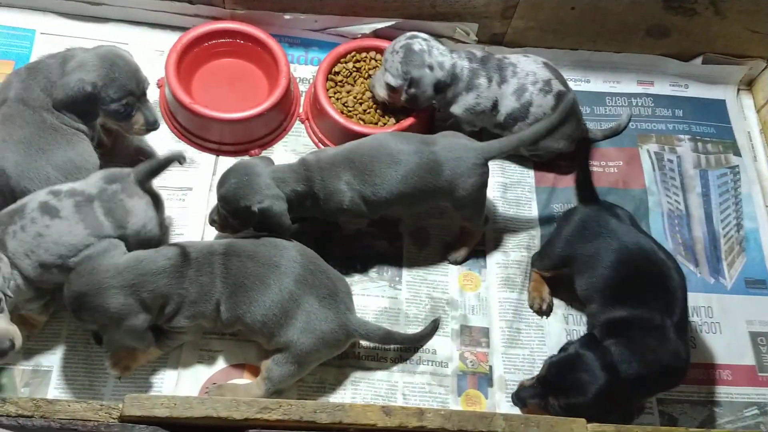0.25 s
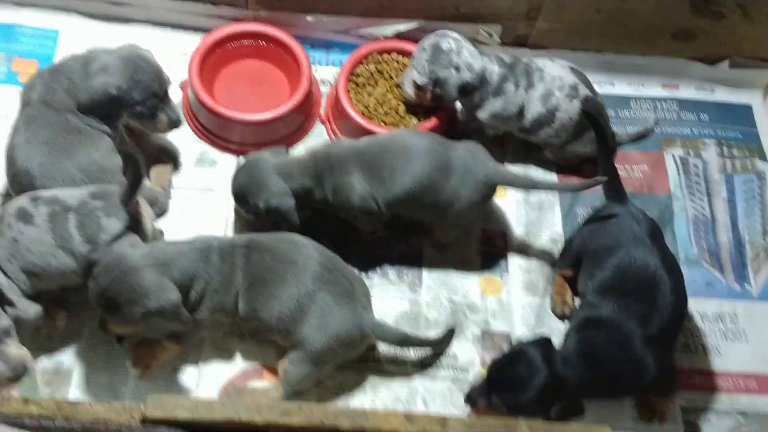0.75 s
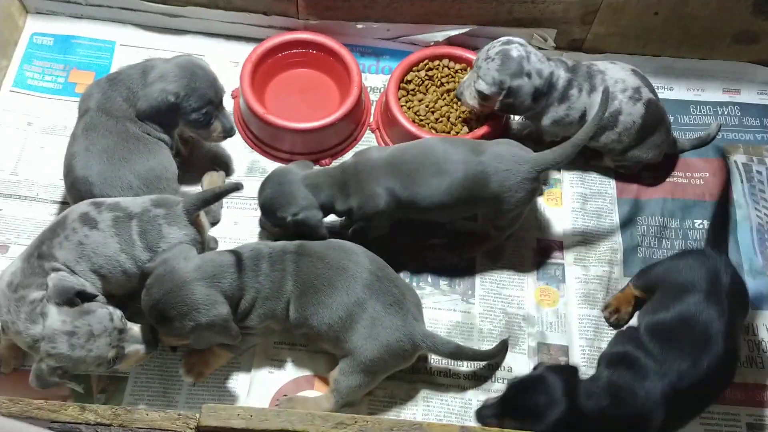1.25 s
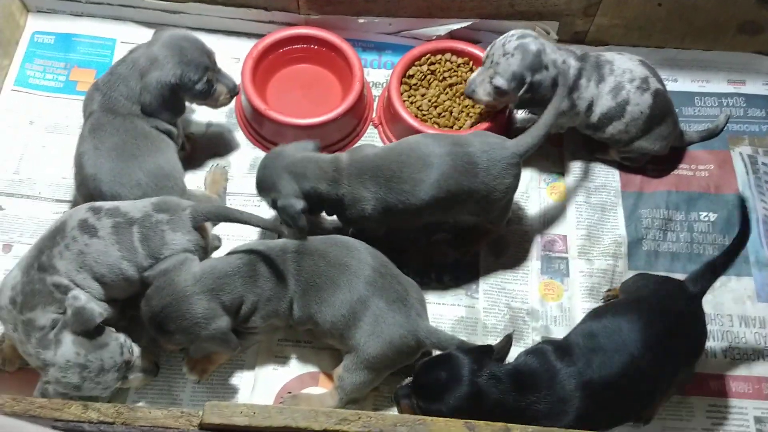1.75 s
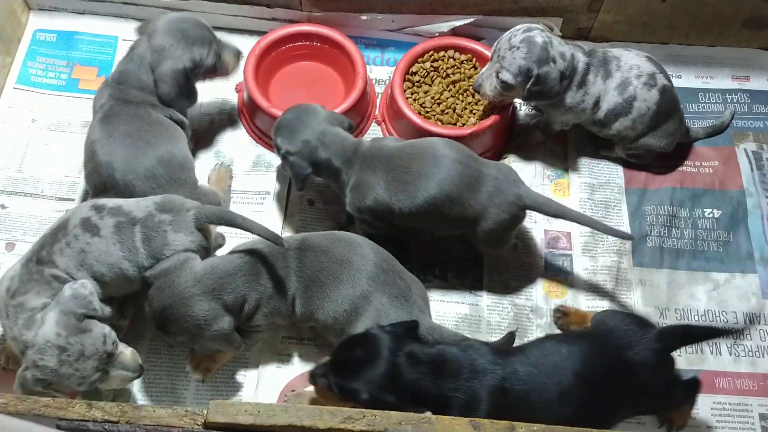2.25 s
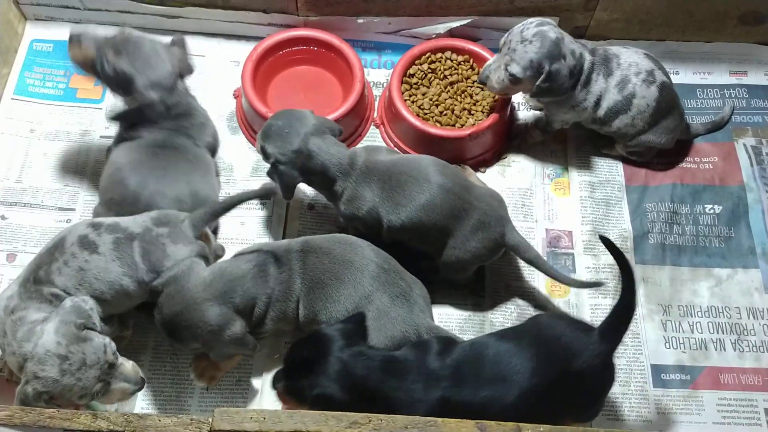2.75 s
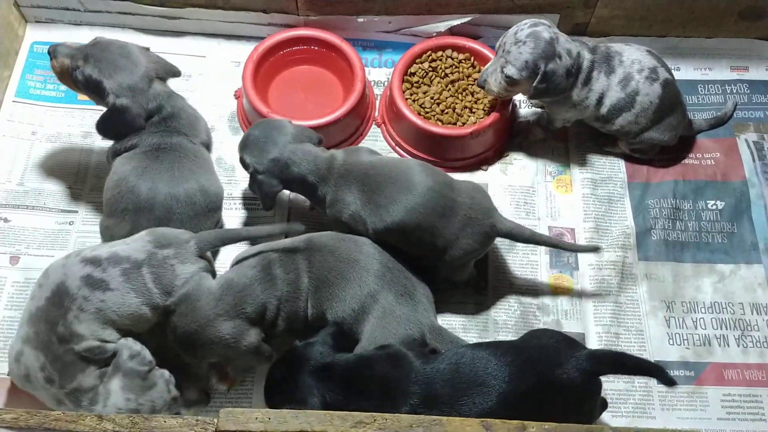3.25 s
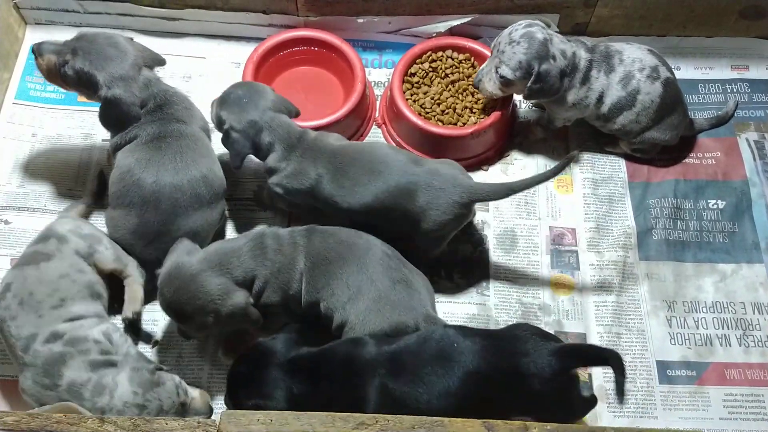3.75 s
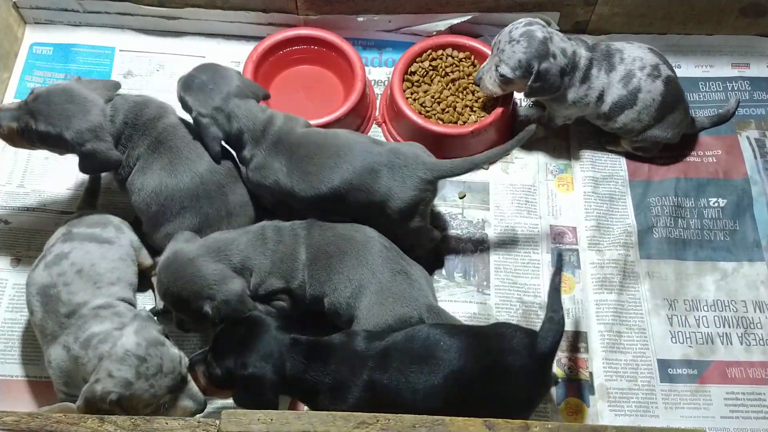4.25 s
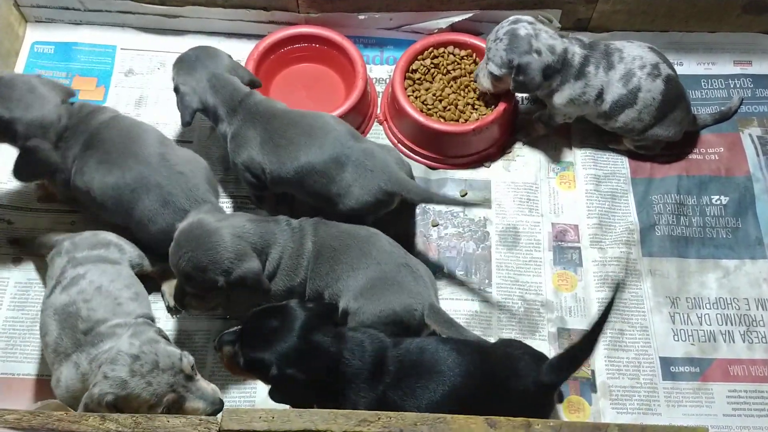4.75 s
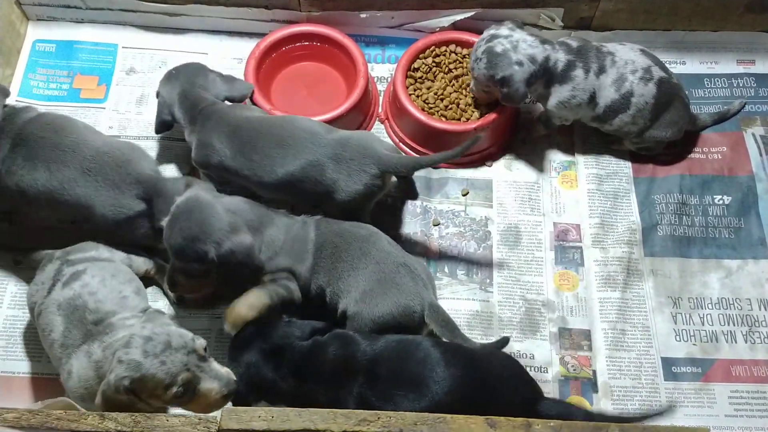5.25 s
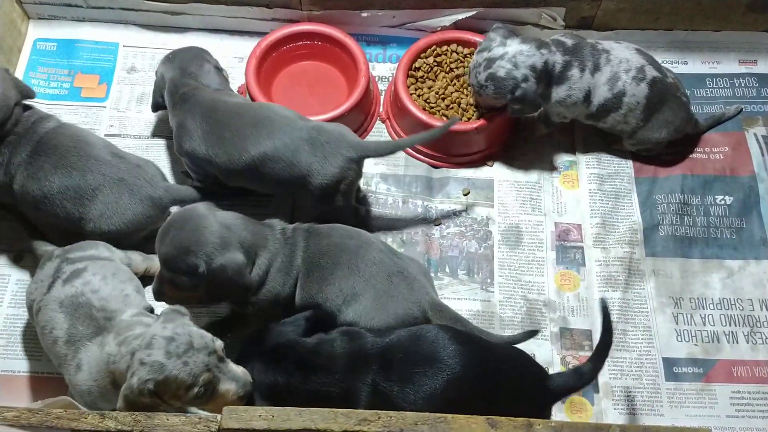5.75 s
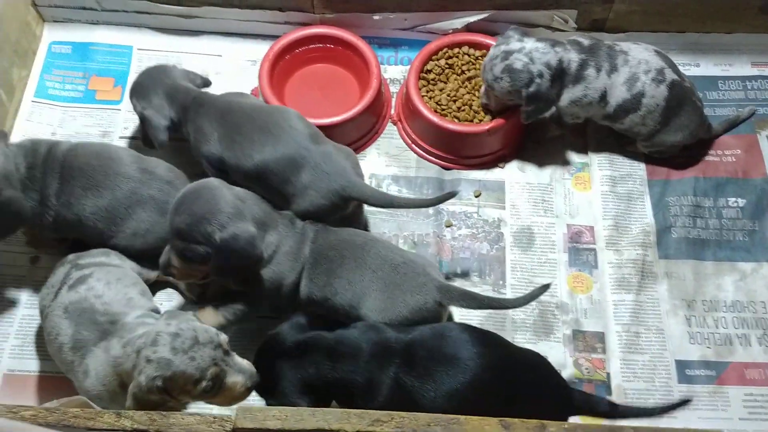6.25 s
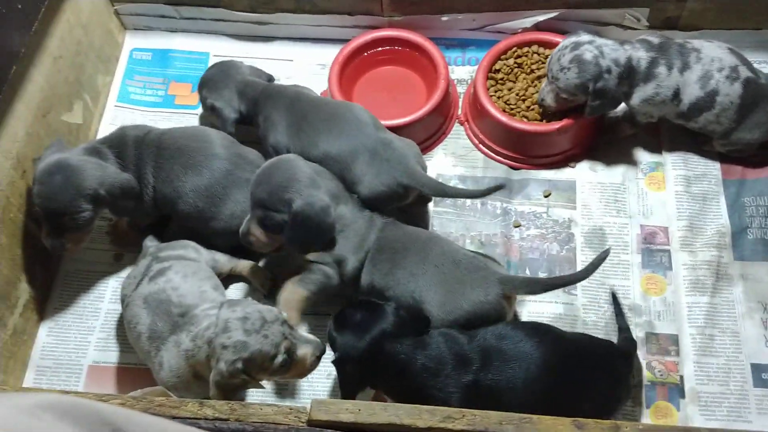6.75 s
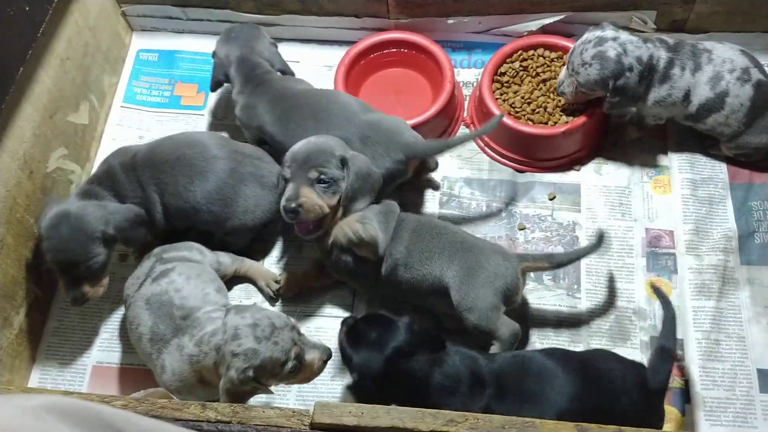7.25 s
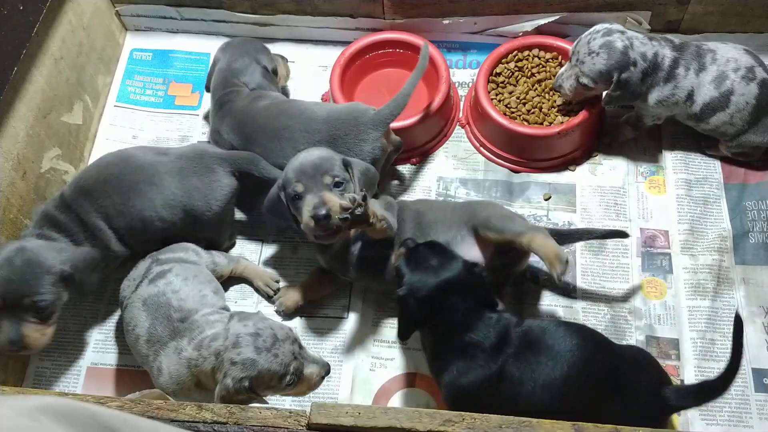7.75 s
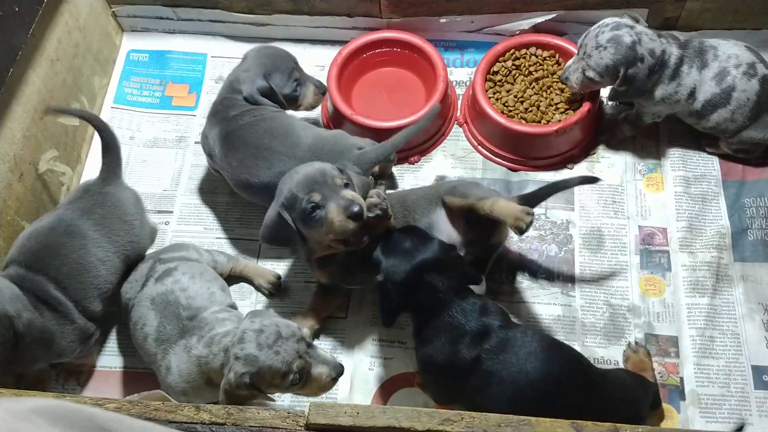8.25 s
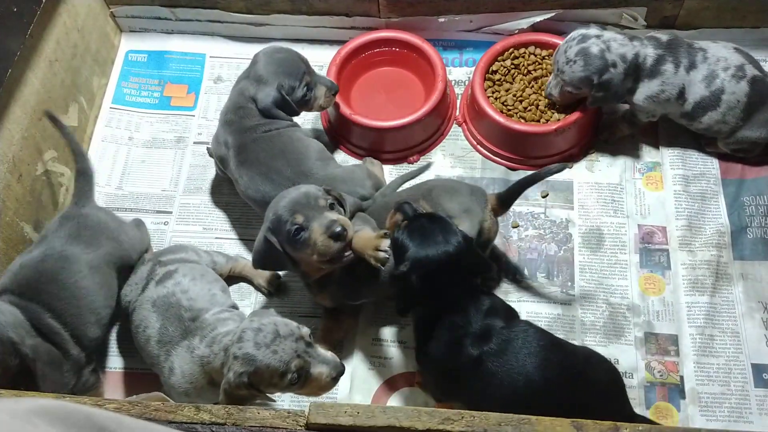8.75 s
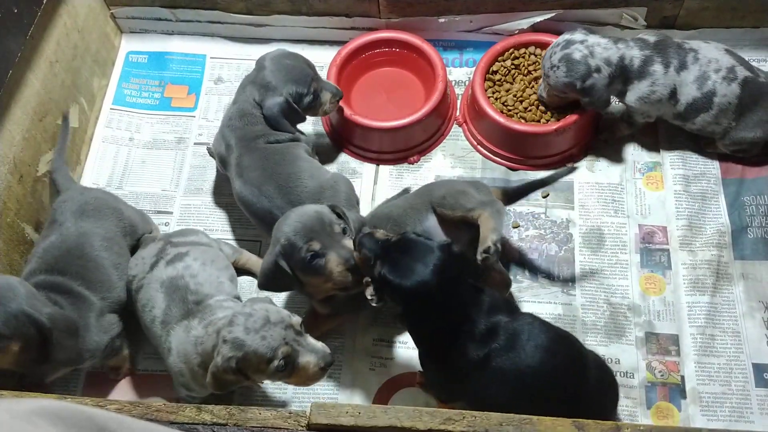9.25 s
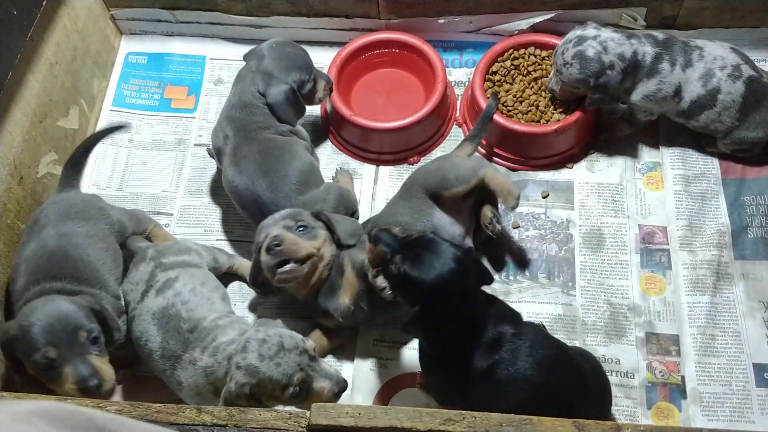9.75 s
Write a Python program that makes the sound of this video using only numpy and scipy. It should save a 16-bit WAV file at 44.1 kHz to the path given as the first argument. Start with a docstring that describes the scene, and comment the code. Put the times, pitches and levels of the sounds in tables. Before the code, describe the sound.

A young puppy whines, yelps and yaps while the litter pads and rustles about on newspaper in a wooden box.

```python
"""A wooden box in a small room: puppies clamber on newspaper, a phone held just above them.
One whines, later yelps, yaps and grunts in a tussle; vocal folds drive the throat, rough under strain.
Pads thump the floor, claws click, paws scuff, creases in the paper buckle; a brief growl at the end.
Box walls and room answer over faint air noise. The phone widens the treble."""
import sys
import numpy as np
from scipy import signal
from scipy.fft import rfft, irfft
from scipy.io import wavfile
from scipy.ndimage import map_coordinates

SR = 44100
rng = np.random.default_rng(int(sys.argv[2]) if len(sys.argv) > 2 else 0)


def log_audio(samples):
    """Write samples as a 16-bit WAV file to the path given in sys.argv[1]."""
    # one column per channel
    frames = np.atleast_2d(samples).T
    # limit to full scale, then quantise
    limited = np.clip(frames, -1, 1)
    pcm = np.round(limited * 32767).astype(np.int16)
    wavfile.write(sys.argv[1], SR, pcm)


N = 440118
TIME_S = np.arange(N) / SR

# long yelp, breaking downward twice: t/s, f/Hz, level/dB, overtones/dB
YELP_CONTOUR = [(7.735, 1005, -41, 5.5), (7.755, 1050, -32.5, 0.5), (7.8, 1094, -38, 9.5),
                (7.821, 1065, -37.5, 6.5), (7.836, 1027, -27.5, -1), (7.845, 883, -36.5, 1.5),
                (7.861, 850, -33.5, 7), (7.884, 825, -45.5, -30), (7.936, 1104, -50.5, -11),
                (7.973, 1025, -37.5, -29.5), (7.992, 898, -45, -3.5), (8.012, 660, -39, -6.5)]
# whines, yaps, grunts: t/s, swell/s, fade/s, first f/Hz, loudest f/Hz, last f/Hz, level/dB,
# overtones/dB, roughness/0-1
SHORT_CALLS = [(2.21, 0.043, 0.06, 855, 885, 940, -52.5, -10, 0.54),
               (2.308, 0.029, 0.041, 1000, 904, 846, -46.5, -3, 0.1),
               (2.368, 0.023, 0.026, 839, 736, 656, -49, -16.5, 0.9),
               (2.785, 0.011, 0.014, 410, 343, 305, -62.5, -45, 0.2),
               (3.403, 0.01, 0.027, 522, 490, 445, -61, -17, 0.77),
               (3.48, 0.013, 0.012, 552, 519, 490, -54, -23, 0.42),
               (5.715, 0.031, 0.13, 271, 264.5, 243.6, -56.5, -26, 0.95),
               (8.078, 0.029, 0.018, 354, 335, 340, -57.5, 2.5, 0.16),
               (8.108, 0.029, 0.019, 366, 422, 425, -40.5, -3.5, 0.23),
               (8.142, 0.011, 0.049, 637, 623, 568, -44, -6, 0.9),
               (8.232, 0.0386, 0.039, 338, 265, 230, -44.5, -20, 0.27),
               (8.681, 0.062, 0.08, 461, 316, 255, -62, -17.5, 0.96),
               (9.335, 0.075, 0.025, 520.4, 588.4, 670, -47, -4, 0.18),
               (9.42, 0.033, 0.025, 632, 751, 937, -38, -4.5, 0.07),
               (9.886, 0.023, 0.026, 1740, 1775, 1870, -41.5, -11, 0),
               (9.935, 0.037, .04, 1886, 1814, 1700, -44.5, 3.5, 0.2)]
# pads landing: t/s, knock level/dB, weight (thud over knock)/dB
PAD_LANDINGS = [(0.065, -69, -4), (0.575, -63, -12), (1.112, -70, -1.5), (1.305, -64, -8.5),
                (1.489, -61.5, -9), (2.176, -58, -3.5), (2.535, -58, 3.5), (3.66, -60, 0.5),
                (3.87, -73.5, 10), (4.066, -59.5, -4.5), (4.482, -67, -3), (4.711, -68.5, 2.5),
                (4.808, -57.5, -8), (5.055, -75, 9), (5.159, -67, 5.5), (5.271, -68, 11.5), (5.454, -62, 4),
                (5.478, -52, -13), (5.706, -65, -2), (5.925, -71, -18.5), (6.2, -84, 10.5),
                (7.453, -70.5, 3.5), (7.497, -60.5, -42), (8.03, -57.5, -10.5), (8.325, -60.5, 2),
                (8.405, -60, -12.5), (8.657, -59, -13), (9.176, -75, 9.5), (9.518, -63.5, 4)]
# claws catching paper: t/s, snap level/dB, knock over snap/dB
CLAW_CATCHES = [(0.512, -65, -12.5), (1.71, -66, -3.5), (1.914, -68, -9), (2.051, -67, -41),
                (2.163, -67, 6), (3.125, -55.5, -9.5), (3.173, -70, -3), (3.347, -64.5, -12),
                (3.603, -59.5, 1.5), (3.71, -63, -2.5), (4.336, -55.5, -12.5), (4.695, -64.5, -7.5),
                (4.808, -58, -10.5), (5.158, -49.5, -6.5), (5.272, -50.5, -2.5), (5.321, -62.5, 2),
                (5.368, -66.5, -1.5), (5.549, -62.5, -25), (6.198, -74, -7), (6.261, -78.5, -14),
                (6.442, -72.5, -23), (6.57, -75, -3.5), (7.079, -67, -37), (7.222, -74, -7.5),
                (7.532, -63, -3), (7.651, -71, -6.5), (7.692, -63.5, 1), (8.277, -76, 13),
                (8.327, -61.5, -2.5), (8.406, -69, 1), (8.906, -67.5, -18)]
# short rough noises (paw scuffs, low boom of two heavy thumps, brief growl at the end):
# t/s, rise/s, fade/s, level/dB, centre f/Hz, relative hiss/dB
ROUGH_BURSTS = [(0, 0.035, 1, -67, 2540, -16), (0.377, 0.026, 0.045, -42, 590, -15),
                (0.383, 0.017, 0.064, -45, 2650, -46), (0.385, 0.021, 0.068, -49, 1350, -11),
                (0.777, 0.006, 0.049, -58.5, 2250, -12.5), (0.864, 0.006, 0.022, -57, 990, -15),
                (2.937, 0.0076, 0.038, -65, 2610, 4), (3.068, 0.056, 0.025, -57.5, 2280, -16),
                (3.098, 0.006, 0.026, -53.5, 720, -16.5), (3.164, .01, 0.065, -60.5, 820, -18),
                (4.03, 0.0082, 0.029, -46, 765, -17), (5.08, 0.047, 0.08, -57.5, 1030, -20),
                (5.269, 0.004, 0.2, -58, 120, -20), (8.322, 0.0054, 0.062, -60, 140.5, -24),
                (7.149, 0.09, 0.029, -63, 1440, -23), (7.18, 0.15, 0.037, -60, 2940, -23),
                (9.11, 0.032, 0.15, -65.5, 1540, -10), (9.739, 0.33, 0.1, -61.5, 1160, -19),
                (9.938, 0.014, 0.041, -54, 820, -2)]
# paper crumpling: t/s, length/s, level/dB, tilt/(dB/octave)
CRUMPLES = [(0.355, 0.17, -57.5, -3.5), (1.174, 0.025, -63, -2.0), (1.705, 0.11, -57.5, -2.5),
            (2.14, 0.36, -71.5, 2), (2.451, 0.056, -60.5, -1), (2.646, 0.09, -63, 2.5),
            (2.816, 0.085, -62, 3), (3.149, 0.062, -61, -1.5), (3.262, 0.2, -66.5, 2.5),
            (3.595, 0.14, -55, 0), (3.735, 0.17, -63.5, 1), (4.255, 0.08, -50, 0), (4.521, 0.037, -57, -5),
            (4.684, 0.056, -55.5, -9), (4.812, 0.078, -61, -3), (4.9, 0.23, -65.5, 6.5),
            (5.308, 0.018, -52, -1.5), (5.434, 0.012, -58, 5.5), (6.082, 0.02, -62, 6),
            (6.191, 0.045, -60, 6), (6.41, 0.034, -56, 6.5), (6.565, 0.026, -57, -1.5),
            (6.657, 0.011, -59.5, -0.5), (7.045, 0.033, -63.5, 0.5), (7.312, 0.022, -57, -2.5),
            (7.753, 0.14, -58, 1), (7.924, 0.033, -54, -0.5), (8.11, 0.043, -56, 0), (8.5, 0.15, -62.5, -1),
            (9.007, 0.05, -62.5, 1.5), (9.316, 0.13, -55.5, -4.5), (9.553, 0.011, -56.5, -7),
            (9.79, 0.22, -60, -5.5)]
# stirring of the whole litter: t/s, level/dB
LITTER_STIR = [(0, -79), (1.65, -87.5), (1.85, -63), (2.45, -71.5), (2.65, -99), (3.4, -74), (4.6, -80.5),
               (5.2, -69.5), (5.55, -66.5), (5.8, -83.5), (6.9, -80.5), (7.4, -67.5), (8.3, -63),
               (8.95, -65.5), (9.98, -62.5)]
# box floor modes: f/Hz, width/Hz, level/dB
FLOOR_RESONANCES = [(135.6, 4.6, -14), (177, 8.8, -4.5), (209, 41, -5), (245.5, 66, 3), (333.5, 33, -5.5),
                    (417.6, 19, 0)]
# box wall echoes: delay/s, gain
WALL_ECHOES = [(.0023, 0.15), (.0041, -0.086), (.0067, .15)]
# source spectra: f/Hz, level/dB
THROAT_SPECTRUM = [(80, -42.5), (250, -6.5), (1000, 1.5), (1650, -6), (2150, -7.5), (2650, -36.5),
                   (3300, -27.5), (4100, -31.5), (5300, -17), (6400, -35.5), (7400, -22), (8600, -36),
                   (12800, -33), (15000, -57)]
BOARD_SPECTRUM = [(70, -40.5), (400, 2), (900, -1), (1600, -6), (2200, 2.5), (3500, -12), (8000, -39.5)]
PAPER_SPECTRUM = [(100, -61.5), (1200, -23), (2000, -3), (3100, -0.5), (4200, -1), (5300, -1), (6500, 0),
                  (10000, 2.5), (12500, -7), (15500, -15.5)]
FUR_SPECTRUM = [(60, -49.5), (250, -8), (900, 5.5), (1500, 12), (3500, -7), (8000, -58)]
AIR_SPECTRUM = [(25, -11), (120, -6), (1500, -14), (2200, -21), (4300, -17), (8000, -15.5), (15000, -19.5)]
# width of scattered sound: f/Hz, side over mid/dB
SIDE_SPECTRUM = [(60, 6.5), (150, -0.5), (350, -6), (700, -8.5), (1100, -15), (1700, 0), (10000, 0)]
# duller left channel: f/Hz, level/dB
LEFT_RESPONSE = [(2000, -0.5), (14000, -4.5)]

CLAW_HZ, CLAW_RISE_S = 1323, 0.00118
CLICK_SHARE = 0.4  # of a claw's power; the rest is scrape
TOP_HZ = 15800


def voices():
    """The puppy's long yelp and short calls."""
    out = np.zeros(N)
    add(out, *cry(yelp()))
    for call in SHORT_CALLS:
        add(out, *cry(whimper(*call)))
    return out


def cry(contour, jitter=0.076, shimmer=0.81, growl_cycles=6.44, rasp_db=-9, edge_s=0.006):
    """Vocal folds ring the throat; an open mouth lets out overtones; strain makes the cycles uneven."""
    knots_s, *columns = np.transpose(contour)
    t = np.arange(knots_s[0] - edge_s, knots_s[-1] + edge_s, 1 / SR)
    n = len(t)
    hz, db, open_db, rough = (np.interp(t, knots_s, column) for column in columns)
    hz = hz * (1 + jitter * rough * walk(n, 350) + 0.0031 * walk(n, 160))
    phase = 2 * np.pi * np.cumsum(hz) / SR
    overtones = np.zeros(n)
    for k in range(2, 30):
        muffle = undb(np.minimum(open_db, 0) * np.log(k / 2) / 2)
        overtones += gain_at(k * hz, THROAT_SPECTRUM) * muffle * (k * hz < TOP_HZ) * np.sin(k * phase)
    tone = np.sqrt(2) * (np.sin(phase) + undb(open_db) * overtones / gain_at(hz, THROAT_SPECTRUM))
    breath = colour(rng.standard_normal(n), THROAT_SPECTRUM)
    rasp = undb(rasp_db + open_db / 2) * rough * (1 + np.cos(phase)) * breath
    # loose tissue flaps once every few cycles
    flutter = 1 + rough * np.cos(phase / growl_cycles) + shimmer * rough * walk(n, 200)
    ramp = np.clip(np.minimum(t - t[0], t[-1] - t) / (2 * edge_s), 0, 1)
    return t[0], (tone * flutter + rasp) * undb(db) * np.sin(np.pi / 2 * ramp) ** 2


def yelp(clean_hz=964, clean_rough=0.0043, rough_per_octave=0.13):
    """Contour of the long cry: clean while high, rough where it sags."""
    return [(t_s, hz, db, open_db, clean_rough + rough_per_octave * max(np.log2(clean_hz / hz), 0))
            for t_s, hz, db, open_db in YELP_CONTOUR]


def whimper(start_s, swell_s, fade_s, first_hz, loudest_hz, last_hz, db, open_db, rough,
            opening_db=-4, closing_db=-14.5, slack_db=-17, slack_rough=0.11):
    """Contour of one push of effort: the voice swells, opens and clears, then slackens."""
    contour = []
    for u in np.linspace(-1, 1, 9):  # loudest at 0
        span_s, end_hz, mouth_db = (
            (swell_s, first_hz, opening_db) if u < 0 else (fade_s, last_hz, closing_db))
        t_s = start_s + swell_s + u * span_s
        hz = loudest_hz + abs(u) * (end_hz - loudest_hz)
        slack = u ** 2
        roughness = min(rough + slack_rough * slack, 1)
        contour.append((t_s, hz, db + slack_db * slack, open_db + mouth_db * slack, roughness))
    return contour


def steps(pad_hz=690, octaves_per_db=0.017):
    """Pads land dull, lower with more weight; claws land bright and scrape on."""
    out = np.zeros(N)
    for start_s, db, weight_db in PAD_LANDINGS:
        knock_hz = pad_hz * 2 ** (-octaves_per_db * weight_db)
        pad = paw(knock_hz, knock_db=db, thud_db=db + weight_db, snap_db=db - 12,
                  rise_s=0.0071, linger_db=-15)
        add(out, start_s, pad)
    for start_s, db, board_db in CLAW_CATCHES:
        claw = paw(CLAW_HZ, knock_db=db + board_db, thud_db=db + board_db - 14.5, snap_db=db,
                   rise_s=CLAW_RISE_S, linger_db=-7.5)
        add(out, start_s, np.sqrt(1 - CLICK_SHARE) * claw)
    return out


def paw(knock_hz, knock_db, thud_db, snap_db, rise_s, linger_db, floor_low_hz=146.5):
    """A paw thumps the floor, rings four board modes and snaps a crease."""
    t = TIME_S[:SR // 5]
    # the small floor radiates little bass
    highpass = signal.butter(2, floor_low_hz, "high", fs=SR, output="sos")
    push = signal.sosfilt(highpass, contact(t, decay_s=0.0028, linger_db=-15))
    thud = sum(undb(db) * resonate(push, hz, 2 * width_hz, 2 * width_hz)
               for hz, width_hz, db in FLOOR_RESONANCES)
    blow = colour(contact(t, decay_s=0.008, linger_db=linger_db, rise_s=rise_s), BOARD_SPECTRUM)
    octaves = 0.34 * (np.linspace(-1, 1, 4) + rng.standard_normal(4) / 2)
    knock = sum(rng.choice([-1, 1]) * resonate(blow, hz, 0.15 * hz) for hz in knock_hz * 2 ** octaves)
    snap = colour(contact(t, decay_s=0.0084, linger_db=-13.5, rise_s=rise_s), crease())
    return unit(thud) * undb(thud_db) + unit(knock) * undb(knock_db) + unit(snap) * undb(snap_db)


def contact(t, decay_s, linger_db, rise_s=0.0018, linger_s=0.042):
    """A burst of tiny slips on landing, weaker ones while settling."""
    settling = np.exp(-t / decay_s) + undb(linger_db) * np.exp(-t / linger_s)
    pressure = np.minimum(t / rise_s, 1) ** 2 * settling
    return grains(len(t), per_s=6000, spread_db=2) * pressure


def claw_clicks(decay_s=0.0013):
    """A claw bites through a fold and meets the board."""
    out, t = np.zeros(N), TIME_S[:SR // 5]
    for start_s, db, board_db in CLAW_CATCHES:
        bite = rng.standard_normal(len(t)) * np.exp(-t / decay_s)
        snap = unit(colour(bite, crease()))
        knock = undb(board_db) * unit(resonate(colour(bite, BOARD_SPECTRUM), CLAW_HZ, CLAW_HZ))
        add(out, start_s + CLAW_RISE_S, np.sqrt(CLICK_SHARE) * undb(db) * (snap + knock))
    return out


def rough_bursts():
    """Paw scuffs, two low booms, a brief growl: dense clicks through a broad resonance, plus hiss."""
    out, t = np.zeros(N), TIME_S[:SR // 2]
    for start_s, rise_s, fade_s, db, hz, hiss_db in ROUGH_BURSTS:
        clicks = grains(len(t), per_s=4000, spread_db=1.7)
        width_hz = min(0.97 * hz, 1300)
        body = unit(resonate(clicks, hz, width_hz, width_hz))
        release = np.exp(-(np.maximum(t - rise_s, 0) / fade_s) ** 2)
        envelope = waver(len(t)) * np.minimum(t / rise_s, 1) * release
        hiss = undb(hiss_db) * colour(clicks, crease())
        add(out, start_s, (body + hiss) * envelope * undb(db))
    return out


def waver(n, spread_db=3):
    """Uneven level, as when a paw catches and lets go."""
    return unit(undb(spread_db * walk(n, 45)))


def rustle(flurry_db=8, tick_db=-6, drag_db=-10, fidget_db=4, rub_db=-6, swell_share=0.19, release_s=0.013):
    """Creases buckle in flurries, each size at its own pitch; some snap; fur drags beneath."""
    creases = np.zeros(N)
    for hz in np.geomspace(1800, 15000, 16):
        buckles = resonate(grains(N, per_s=550, spread_db=2.9), hz, 0.25 * hz, 0.54 * hz)
        creases += buckles * undb(flurry_db * np.tanh(walk(N, 17))) / hz ** 0.18
    snaps = grains(N, per_s=40, spread_db=2.4)
    ticks = signal.fftconvolve(snaps, contact(TIME_S[:SR // 50], decay_s=0.002, linger_db=-30))[:N]
    crinkle = unit(creases) + undb(tick_db) * unit(ticks)
    fur = colour(grains(N, per_s=3000, spread_db=1.1), FUR_SPECTRUM)
    drag = undb(drag_db) * unit(fur * undb(9.1 * walk(N, 23)))
    stir_db = np.interp(TIME_S, *np.transpose(LITTER_STIR)) + fidget_db * walk(N, 14)
    out = (unit(colour(crinkle, PAPER_SPECTRUM)) + drag) * undb(stir_db)
    for start_s, length_s, db, tilt_db in CRUMPLES:
        span = slice(int(start_s * SR), int((start_s + length_s) * SR) + SR // 5)
        t = TIME_S[span] - TIME_S[span][0]
        release = np.exp(-np.maximum(t - length_s, 0) / release_s)
        pressure = waver(len(t)) * np.minimum(t / (swell_share * length_s), 1) * release
        fold = unit(colour(crinkle[span], crease(tilt_db)))
        add(out, start_s, (fold + undb(rub_db) * drag[span]) * pressure * undb(db))
    return out


def crease(tilt_db_per_octave=0, spread_db=5):
    """Spectrum of one paper fold: each has its own peaks, tight folds are brighter."""
    hz = np.geomspace(300, 15500, 24)
    db = 20 * np.log10(gain_at(hz, PAPER_SPECTRUM)) + tilt_db_per_octave * np.log2(hz)
    return np.transpose([hz, db + spread_db * rng.standard_normal(len(hz))])


def box_echoes(sound, lag_ms=0.052):
    """A sound and its wall echoes, reaching the right microphone port slightly later."""
    left = sound.copy()
    for delay_s, gain in WALL_ECHOES:
        add(left, delay_s, gain * sound)
    right = map_coordinates(left, [np.arange(N) - lag_ms * SR / 1000])
    return np.array([left, right])


def room_tail(x, t60_s=0.32, onset_s=0.013, treble_db=-7):
    """Diffuse answer of the small room, weaker in the treble."""
    t = TIME_S[:SR // 2]
    tail = rng.standard_normal(len(t)) * undb(-60 * t / t60_s) * np.clip(t / onset_s - 0.5, 0, 1)
    damping = gain_at(np.fft.rfftfreq(len(t), 1 / SR), [(1000, 0.019), (6000, treble_db)])
    response = irfft(rfft(tail / np.linalg.norm(tail)) * damping)
    return signal.fftconvolve(x, response)[:N]


def air(level_db=-81.5):
    """Faint steady noise of the room's air."""
    return undb(level_db) * colour(rng.standard_normal(N), AIR_SPECTRUM)


def ports(mid, side):
    """Scattered sound at two microphone ports: alike in the midrange, unrelated in the treble."""
    share = gain_at(np.fft.rfftfreq(2 * N, 1 / SR), SIDE_SPECTRUM)
    mid, side = rfft(mid, 2 * N), share * rfft(side, 2 * N)
    return irfft(np.array([mid + side, mid - side]) / np.sqrt(1 + share ** 2))[:, :N]


def undb(db):
    """Decibels to gain."""
    return 10 ** (np.asarray(db) / 20)


def unit(x):
    """Scale to rms 1."""
    return x / np.sqrt(np.mean(x ** 2) + 1e-30)


def add(out, start_s, x):
    """Mix x into out from start_s."""
    i = max(int(start_s * SR), 0)
    out[i:i + len(x)] += x[:max(N - i, 0)]


def gain_at(hz, spectrum):
    """Gain of a spectrum given as f/Hz, level/dB."""
    knots_hz, db = np.transpose(spectrum)
    return undb(np.interp(np.log(np.maximum(hz, 1)), np.log(knots_hz), db))


def colour(x, spectrum, size=2048):
    """Minimum-phase filter of the given spectrum, unit power gain."""
    cepstrum = irfft(np.log(gain_at(np.fft.rfftfreq(size, 1 / SR), spectrum)))
    cepstrum[1:size // 2] *= 2
    cepstrum[size // 2 + 1:] = 0
    response = irfft(np.exp(rfft(cepstrum)))
    return signal.fftconvolve(x, response / np.linalg.norm(response))[:len(x)]


def resonate(x, hz, *widths_hz):
    """Resonators in series, one per width, gain 1 at the centre."""
    for width_hz in widths_hz:
        x = signal.lfilter(*signal.iirpeak(min(hz, SR / 2 - 2000), hz / width_hz, fs=SR), x)
    return x


def walk(n, turns_per_s):
    """Random drift, spread near 1."""
    position = np.arange(n) / SR * turns_per_s
    knots = int(position[-1]) + 2
    return np.interp(position, np.arange(knots), rng.standard_normal(knots))


def grains(n, per_s, spread_db):
    """Random clicks, most small, a few large."""
    sizes = undb(spread_db * np.minimum(rng.exponential(size=n), 5))
    return unit((rng.random(n) < per_s / SR) * sizes * rng.choice([-1, 1], n))


def scene(room_db=-6):
    """Cries and claw clicks from one spot; steps, rough noises, paper, room and air from all around."""
    direct = voices() + claw_clicks()
    scattered = []
    for _ in ("mid", "side"):
        clamber = steps() + rough_bursts() + rustle()
        scattered.append(clamber + air() + undb(room_db) * room_tail(direct + clamber))
    return box_echoes(direct) + ports(*scattered)


def record(dry, port_delay_s=0.0004627, cross_feed=0.69, widen_ramp_hz=(1350, 1950)):
    """The phone subtracts from each port the other's delayed treble, dulls the left, cuts the top."""
    hz = np.fft.rfftfreq(2 * N, 1 / SR)
    feed = np.interp(hz, widen_ramp_hz, [0, cross_feed])
    both = rfft(dry, 2 * N)
    opposite = np.exp(-2j * np.pi * hz * port_delay_s) * both[::-1]
    wide = irfft((both - feed * opposite) / np.sqrt(1 + feed ** 2))[:, :N]
    wide[0] = irfft(rfft(wide[0], 2 * N) * gain_at(hz, LEFT_RESPONSE))[:N]
    lowpass = signal.ellip(10, 0.2, 70, TOP_HZ, fs=SR, output="sos")
    return signal.sosfilt(lowpass, wide)


dry = scene()
out = record(dry)
log_audio(out)
```